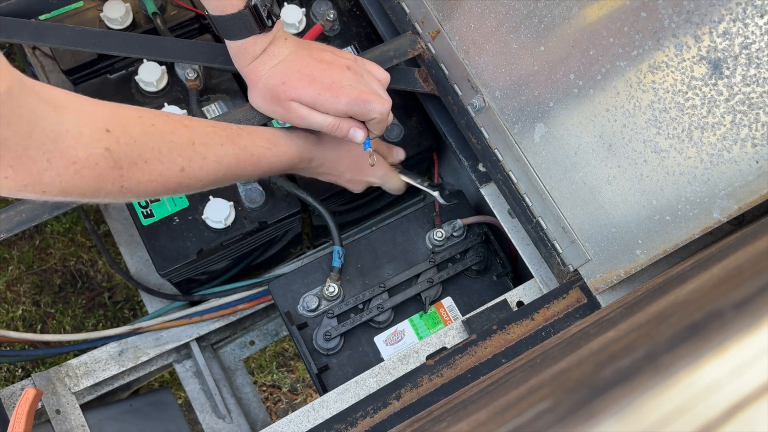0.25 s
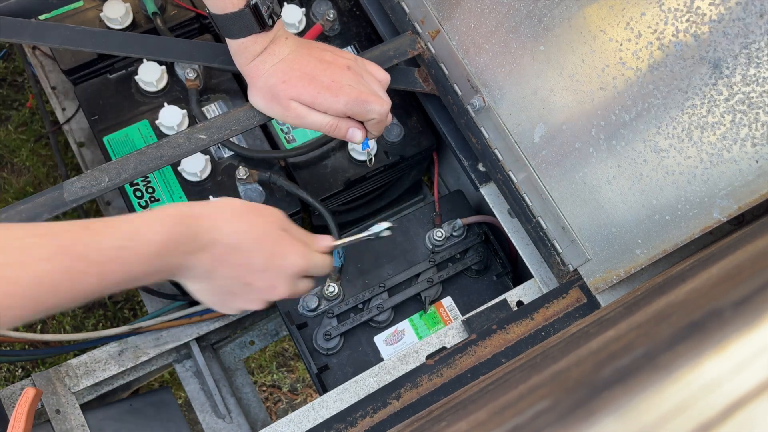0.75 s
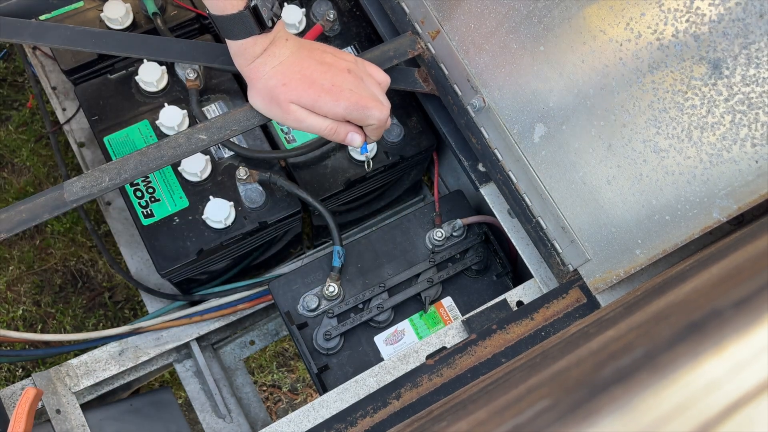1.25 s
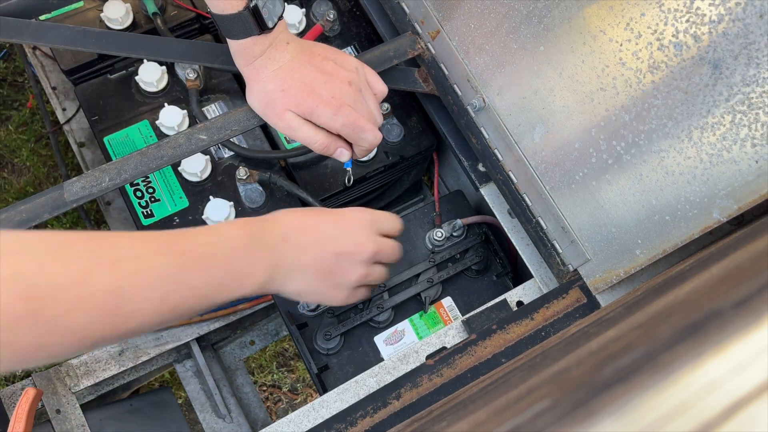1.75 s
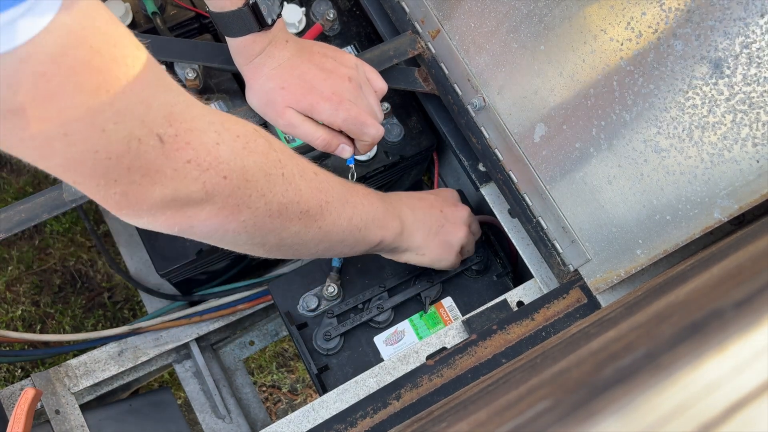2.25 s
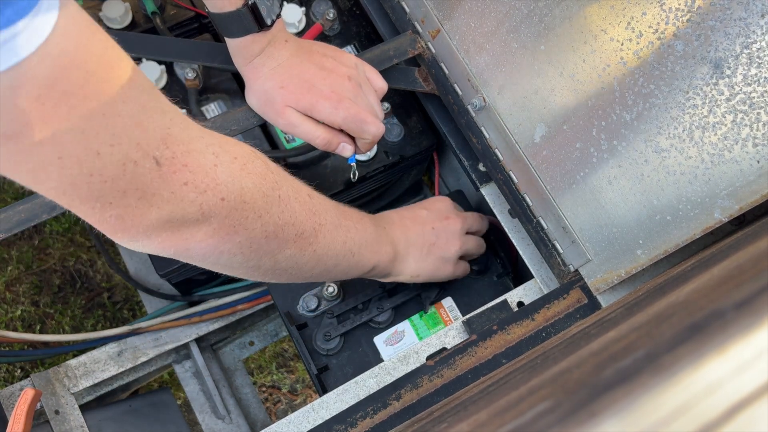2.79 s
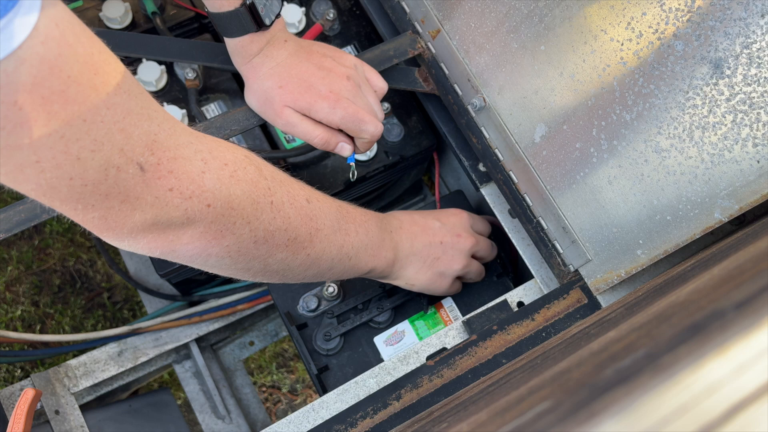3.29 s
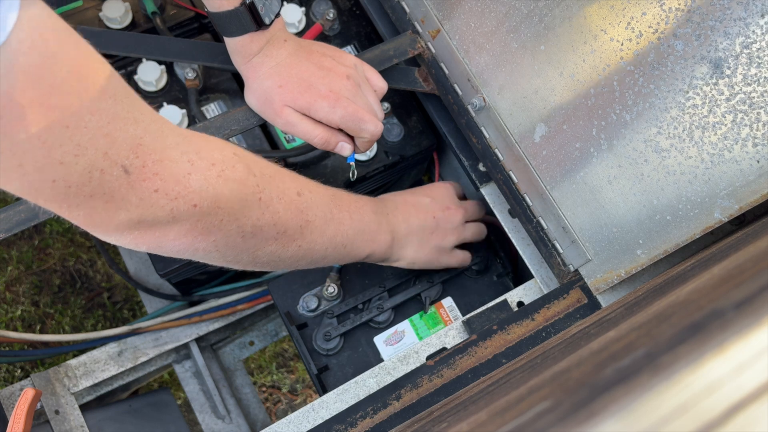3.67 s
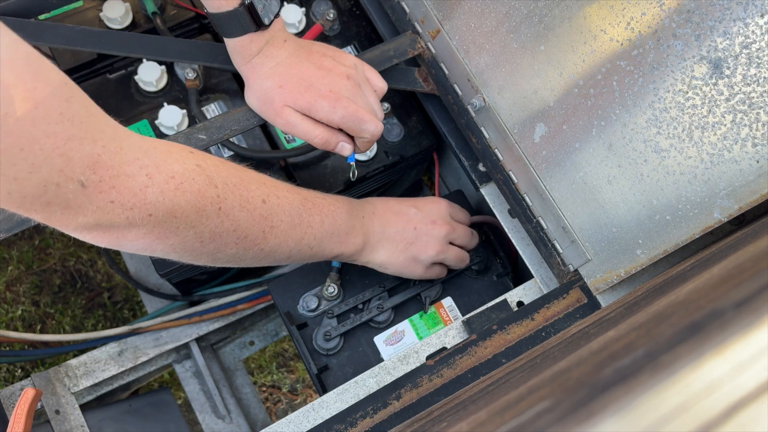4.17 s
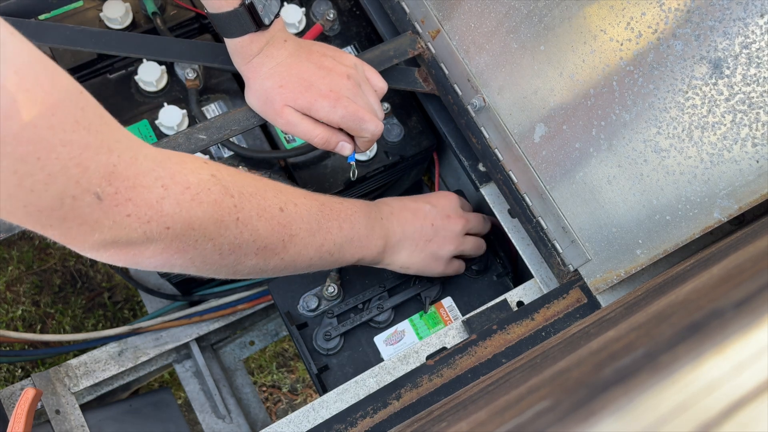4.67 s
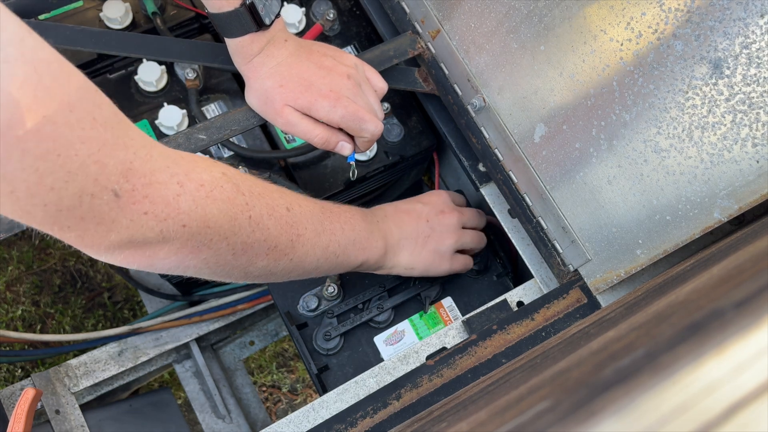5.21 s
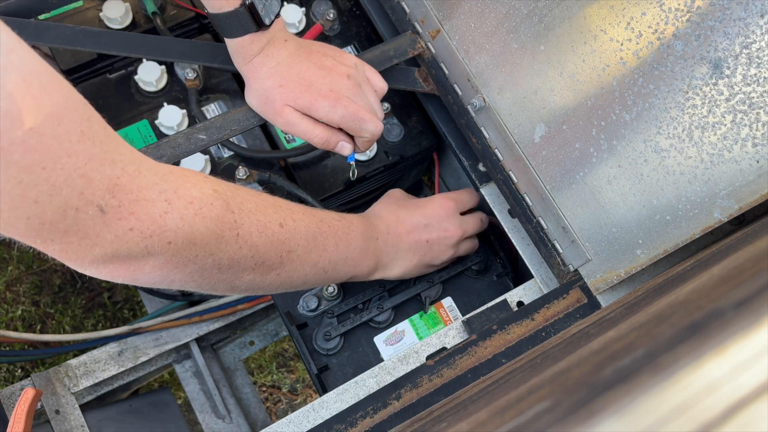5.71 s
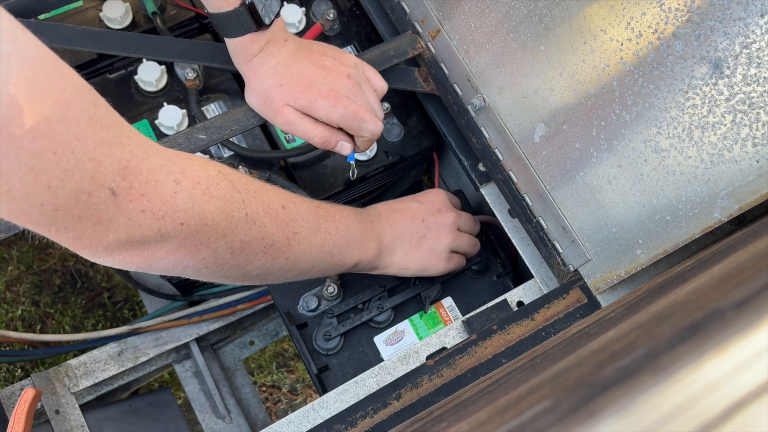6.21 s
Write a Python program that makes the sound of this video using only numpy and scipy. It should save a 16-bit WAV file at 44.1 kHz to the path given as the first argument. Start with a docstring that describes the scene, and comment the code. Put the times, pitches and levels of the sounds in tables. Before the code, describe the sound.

Outdoors, close stereo microphone, with a soft, low rumble of far traffic throughout. At about 0.1 s a spanner comes off a nut with two or three small clicks and a dull low thump; then only faint rustle and airy sleeve hiss, swelling near 0.8 s. From 1.33 to 1.5 s the spanner hits a sheet-metal frame and bounces: a loud, bright, rattling clang, strongest at 1.40 and 1.46 s, with low hollow thumps and a short ring dying quickly. A bright skin-and-cloth hiss brushes by at 1.9 s. From 2.4 s fingers spin the nut off: tiny irregular ticks, scuffs and gritty rubbing, with a clearer click at 2.84 s, others around 3.65, 4.14 and 4.65 s. It thins after 5 s, while faint distant tones swell around 5.5 and 5.9 s, then firmer clicks cluster from 6.07 s, the sharpest at 6.37 s.

```python
"""Outdoors at a battery box, a small stereo microphone close by: a spanner leaves the nut, is dropped on a
sheet-metal frame and bounces, made of shaped noise for crack and dense ring, and of struck modes.
Low thumps ring the box. Fingers spin the nut off its stud with ticks, scuffs and a grainy rustle, made of
noise grains, struck modes and box resonances; skin and sleeve hiss in bright noise as the arm moves.
Far traffic rumbles underneath in wavering noise bands, with two faint tones from narrow resonances."""
import sys
import numpy as np
from scipy import signal
from scipy.fft import rfft, irfft, next_fast_len
from scipy.io import wavfile

SR = 44100
rng = np.random.default_rng(int(sys.argv[2]) if len(sys.argv) > 2 else 0)


def store_wav(level_fs):
    """Save 16-bit WAV to argv[1]."""
    pcm = np.round(np.clip(np.atleast_2d(level_fs), -1, 1) * 32767)
    wavfile.write(sys.argv[1], SR, pcm.T.astype(np.int16))


N = 284445
T = np.arange(N) / SR


def from_db(db):
    """dB to gain."""
    return np.exp(np.asarray(db) * np.log(10) / 20)


def rms_one(x):
    """Scale to rms 1."""
    return x / np.sqrt(np.mean(x ** 2) + 1e-20)


def in_time(curve):
    """A (seconds, value) table read at every sample."""
    return np.interp(T, *np.transpose(curve))


def at_hz(curve, hz):
    """A (Hz, value) table read on a log-frequency axis."""
    points_hz, values = np.transpose(curve)
    return np.interp(np.log(hz), np.log(points_hz), values)


def drift(corner_hz):
    """Slow random wander of rms 1: noise through two equal low-pass poles, at a fortieth of the rate."""
    r = np.exp(-2 * np.pi * corner_hz * 40 / SR)
    noise = rng.standard_normal(N // 40 + 2002)
    slow = signal.lfilter([1], [1, -2 * r, r * r], noise)[2000:]
    return np.interp(np.arange(N) / 40, np.arange(len(slow)), rms_one(slow))


def resonance(x, hz, width_hz):
    """Two-pole peak of gain 1."""
    r = np.exp(-np.pi * width_hz / SR)
    poles = [1, -2 * r * np.cos(2 * np.pi * hz / SR), r * r]
    return signal.lfilter(np.array([1, 0, -1]) * (1 - r * r) / 2, poles, x)


def ring_width(t60):
    """Width in Hz of a resonance that dies by 60 dB in t60 seconds."""
    return np.log(1000) / np.pi / t60


def ring(clicks, hz, t60):
    """A unit click sets a dying sine of starting height 1 ringing."""
    r, w = from_db(-60 / (t60 * SR)), 2 * np.pi * hz / SR
    return signal.lfilter([0, np.sin(w)], [1, -2 * r * np.cos(w), r * r], clicks)


def tilt(hz, bass_db, treble_db):
    """Colour of a contact in dB: a slope each side of 3 kHz, in full from two octaves away."""
    octaves = np.log2(hz / 3000)
    if octaves < 0:
        return bass_db * min(-octaves / 2, 1)
    return treble_db * min(octaves / 2, 1)


def lean(balance, hz):
    """Gains of the left and right port from a left-minus-right balance in dB."""
    half_db = at_hz(balance, hz) / 2
    return from_db([[half_db], [-half_db]])


def rise_s(hz):
    """Build-up time of a struck body: far shorter at high pitches."""
    return 0.0017 * (500 / hz) ** 2


def favour(hz, pitches_hz):
    """How near a mode lies to the pitches of each contact, 0-1; near modes are struck harder."""
    width_octaves = 0.085
    return np.exp(-(np.log2(hz / pitches_hz) / width_octaves) ** 2).max(axis=1)


def decays(blows, hz, t60s, length):
    """Power of all blows in one band: each builds up quickly and dies away."""
    power = np.zeros(length)
    for (s, db, bass_db, treble_db, *_), t60 in zip(blows, t60s):
        start = round(s * SR)
        t = T[:min(int(.4 * SR), int(1.5 * t60 * SR))]
        dying = from_db(db + tilt(hz, bass_db, treble_db) - 60 * t / t60)
        building = 1 - np.exp(-t / rise_s(hz))
        power[start:start + len(t)] += ((dying * building) ** 2)[:length - start]
    return power


def bands(source, envelope, spectrum, likeness, balance):
    """Third-octave noise: two draws of (mid, side) are shaped by envelope(Hz), then filtered band by band."""
    low_hz, high_hz = spectrum[0][0], spectrum[-1][0]
    edges = 25 * 2 ** (np.arange(30) / 3)
    edges = edges[(edges > low_hz * 1.2) & (edges < high_hz * 1.05)]
    centres = np.sqrt(edges[1:] * edges[:-1])
    power = np.sum(from_db(at_hz(spectrum, centres)) ** 2 * np.diff(edges)) / (SR / 2)
    out = 0
    for k, hz in enumerate(centres):
        sos = signal.butter(2, edges[k:k + 2], "band", fs=SR, output="sos")
        # neighbouring bands take different draws; shaping before filtering lets nothing sound early
        mid, side = signal.sosfilt(sos, source[k % 2] * envelope(hz) + 1e-18)
        alike = np.clip(at_hz(likeness, hz), -1, 1)
        pair = np.sqrt(1 + alike) * mid + np.sqrt(1 - alike) * side * [[1], [-1]]
        out = out + from_db(at_hz(spectrum, hz)) * pair * lean(balance, hz)
    return out / np.sqrt(2 * power)


def struck(blows, modes, level_db, spread_db, likeness, balance, length):
    """Every blow strikes every mode with a strength of its own; level_db(Hz) sets the common level."""
    out = np.zeros((2, length))
    strengths = rng.normal(0, 1, (len(blows), len(modes)))
    starts = np.round(blows[:, 0] * SR).astype(int)
    for k, (hz, db, t60) in enumerate(modes):
        tilt_db = tilt(hz, blows[:, 2], blows[:, 3])
        clicks = np.full(length, 1e-18)
        clicks[starts] = from_db(blows[:, 1] + tilt_db + level_db(hz) + db + spread_db * strengths[:, k])
        # a fast-dying copy is taken away, so that the mode builds up
        build_up = min(np.log(1000) * rise_s(hz), t60 / 2)
        sound = ring(clicks, hz, t60) - ring(clicks, hz, build_up)
        # each mode reaches one port later, the sides taking turns
        lag = round(np.arccos(np.clip(at_hz(likeness, hz), -1, 1)) / (2 * np.pi * hz) * SR)
        out += np.array([sound, np.roll(sound, lag)])[::(-1) ** k] * lean(balance, hz)
    return out


# Bounces of the spanner on the frame, close by. Each row: start in seconds, level in dB, bass in dB re level,
# treble in dB re level, ring length as a factor, low pitch in Hz, high pitch in Hz.
BOUNCES = [(1.2582, -58, -6, -28, 18, 860, 2170), (1.335, -15, -1, 0.5, 1.57, 500, 869),
           (1.3616, -34, 0, -8, 5, 1240, 3500), (1.3686, -30.5, 2, -12, 0.87, 860, 1480),
           (1.4, -1.5, -4.5, 0, 1.5, 870, 1186), (1.414, -19.5, -4, -11.5, 1, 520, 680),
           (1.4214, -17, -4, -5, 1.8, 1491, 4700), (1.4327, -19, 1.5, -10, 0.36, 520, 380),
           (1.457, -2.5, -5, -2.5, 1.7, 880, 5230), (1.4795, -16.5, -1.5, 0, 1.81, 987, 284),
           (1.5106, -34, 3, -17, 4, 1103, 1755)]
# Many close modes of the sheet-metal frame. Each row: frequency in Hz, relative density in dB per Hz.
FRAME_SPECTRUM = [(71, -45), (120, -16), (279, -7.5), (413, -12), (518, -4.5), (1510, -8), (1640, -12),
                  (1750, -12), (3450, -15), (4700, -9), (7860, -14.5), (13200, -10.5), (16500, -40.5)]
# Dying of the dense ring, before the bounce's factor. Each row: frequency in Hz, t60 in seconds.
FRAME_T60 = [(150, 0.21), (500, 0.12), (1500, 0.074), (4000, 0.063), (12000, 0.035)]
# Modes of spanner and frame that stand out. Each row: frequency in Hz, relative level in dB, t60 in seconds.
SPANNER_MODES = [(201.4, -9.5, .3), (252, -11, 0.2), (284, -10, 0.22), (376, -9, 0.18), (476, -7, .1),
                 (515, 0, 0.12), (590, -10, 0.12), (675, -5, .08), (725, -8, .08), (806, -1, 0.1),
                 (880, 2, 0.045), (985, -1, 0.16), (1090, -9, 0.1), (1186, 0, .06), (1230, -4, .12),
                 (1477, -3, 0.12), (1725, -3, 0.04), (1762, -8, .15), (2130, -3, 0.06), (2640, -10, 0.12),
                 (3035, -1.5, 0.025), (3200, -6, 0.04), (3890, -6, 0.06), (4380, -7, 0.06), (4590, -4, .05),
                 (4800, -3, 0.03), (5090, -3, 0.03), (5620, -9, 0.03), (6280, -6, 0.06), (6900, -7, 0.05),
                 (10070, -8, 0.02), (12200, -5, 0.02), (13000, -4, .02), (12390, -33, .33)]
# Stereo of the frame at the microphone. Each row: frequency in Hz, left-right likeness from -1 to 1.
FRAME_LIKENESS = [(100, 0.51), (300, 0.78), (1000, 0.099), (2000, 0.53), (5000, 0.61), (12000, 1)]
# Side on which the frame lies. Each row: frequency in Hz, left minus right in dB.
FRAME_BALANCE = [(60, 2), (180, 0.5), (550, 7), (1650, 3.5), (4970, 1.5), (15000, -0.5)]
FRAME_DB, CRACK_DB, CRACK_T60_S = -8, 6, .012
SPANNER_DB, BOUNCE_FAVOUR_DB = -15.5, 9
STRIKE_SPREAD_DB = 2.5   # each bounce strikes the modes a little differently
DENSE_RING_SHARE, RATTLE_DB = .85, -1


def spanner():
    """Each bounce: a short crack, the dense ring of the frame dying band by band, and the clear modes."""
    length, blows = int(2.2 * SR), np.array(BOUNCES)

    def envelope(hz):
        dense_ring = decays(blows, hz, blows[:, 4] * at_hz(FRAME_T60, hz), length)
        crack = decays(blows, hz, [CRACK_T60_S] * len(blows), length)
        return from_db(FRAME_DB) * np.sqrt(dense_ring + from_db(CRACK_DB) ** 2 * crack)

    def level_db(hz):
        return SPANNER_DB + BOUNCE_FAVOUR_DB * favour(hz, blows[:, 5:])

    noise = rng.standard_normal((2, 2, length))
    frame = bands(noise, envelope, FRAME_SPECTRUM, FRAME_LIKENESS, FRAME_BALANCE)
    rattle = 0   # the rattling frame keeps exciting the clear modes
    for k, (hz, db, t60) in enumerate(SPANNER_MODES):
        rattle = rattle + (-1) ** k * from_db(db) * resonance(frame, hz, ring_width(t60))
    clear = struck(blows, SPANNER_MODES, level_db, STRIKE_SPREAD_DB, FRAME_LIKENESS, FRAME_BALANCE, length)
    out = DENSE_RING_SHARE * frame + from_db(RATTLE_DB) * rattle + clear
    return np.pad(out, ((0, 0), (0, N - length)))


# Soft low pushes of hand and spanner into the box. Each row: start in seconds, level in dB, pitch in Hz.
THUMPS = [(0.102, -40.5, 350), (0.123, -47, 280), (0.146, -46, 158), (.183, -33, 113.6),
          (1.341, -35.5, 215), (1.403, -33, 120), (1.445, -30, 240), (1.479, -23, 257), (1.501, -33.5, 193),
          (1.51, -32.5, 92.5), (1.579, -39.5, 170.5), (1.573, -37, 276)]
# Low modes of the hollow box. Each row: frequency in Hz, relative level in dB, t60 in seconds.
HOLLOW = [(85.62, -4.5, 0.27), (115, 1, 0.11), (150, 1.5, 0.17), (216, 3.5, 0.096), (254, -3.5, 0.28),
          (285.4, -9, 0.4), (348, -2.5, 0.097)]
PUSH_OCTAVES = 0.47   # a push sounds the modes near its pitch


def thumps():
    """Each push rings the low modes of the box near its pitch, with a soft start, alike at both ports."""
    out = np.zeros(N)
    click = np.eye(1, SR // 2)[0] + 1e-18
    for hz, mode_db, t60 in HOLLOW:
        soft = ring(click, hz, t60) * (1 - np.exp(-T[:len(click)] * hz * 2))
        for s, db, pitch_hz in THUMPS:
            start = round(s * SR)
            nearness = np.exp(-(np.log2(hz / pitch_hz) / PUSH_OCTAVES) ** 2)
            out[start:start + len(click)] -= from_db(db + mode_db) * nearness * soft
    return out


# Short scuffs of finger, thread and cable at the box. Each row: middle in seconds, level in dB,
# bass in dB re level, treble in dB re level, low pitch in Hz, high pitch in Hz.
SCUFFS = [(0.095, -67.5, 22, 0, 925, 2570), (0.118, -53.5, 1, 15, 625, 4100),
          (0.17, -78, 2, -13, 686, 3230), (0.268, -64, -6, 16, 656, 3100), (1.295, -64, 3, 4, 857, 2140),
          (1.64, -67, 1, -15, 1414, 2920), (1.695, -66, -3, 0, 1220, 4350),
          (1.955, -70, 11.5, 20, 1184, 4304), (2.169, -69.5, -1, 21.5, 652, 3620),
          (2.403, -61.5, -6, 14, 643, 3610), (2.475, -70, 12.5, 16, 609, 3620),
          (2.615, -72, 17, 14, 635, 3210), (2.688, -65.5, 13.5, 15, 920, 2710),
          (2.715, -77, 17, 4, 703, 3160), (2.77, -72, -2, 0, 730, 2660), (2.809, -56, 1.5, 13, 699, 3530),
          (2.836, -61, 8, 5, 650, 3640), (2.875, -68, -2, -2, 730, 2670), (2.926, -69.5, 19, -9, 930, 4430),
          (3.135, -64, -3, 13, 738, 3640), (3.355, -80, 26, 0, 663, 2380), (3.376, -68.5, 8, 12, 609, 3660),
          (3.413, -74.5, 14, 0, 1210, 3640), (3.51, -69, -9, -8, 731, 3610),
          (3.534, -67, 7, 17.5, 684, 3800), (3.63, -69.5, -5, 9, 920, 2700), (3.657, -56, 1, 6, 632, 2730),
          (3.704, -67.5, 9.5, 5, 914, 2760), (3.972, -71, -6, 7, 840, 2740),
          (4.266, -75.5, 10.5, 26, 662, 4880), (4.31, -69, -19, 17, 787, 3646),
          (4.52, -76, 18, 1, 1260, 3650), (4.72, -60.5, 1, 6, 1700, 3405),
          (4.778, -72.5, 2.5, 22, 731, 4360), (4.87, -82, 3, 28, 716, 2870),
          (5.053, -73, 9.5, 16, 686, 2290), (5.2, -67, -1, 12, 703, 3590), (5.42, -74, -1, 13, 652, 3340),
          (5.663, -69.5, 2, -5, 693, 3600), (5.774, -76, 15, 19, 761, 2630),
          (5.95, -70.5, 10, 10, 678, 3650), (6.048, -65.5, -1.5, -10, 873, 3210),
          (6.11, -60.5, 5.5, -5, 660, 2640), (6.387, -55, 2.5, -8, 632, 3760)]
SCUFF_HALF_S, SCUFF_LENGTH_SLOPE = 0.017, 0.23   # at 3 kHz; the low knock is shorter than the hiss


def swells(hz, boost_db):
    """Power of all scuffs in one band: each swells and fades like a bell curve."""
    power = np.zeros(N)
    half = SCUFF_HALF_S * (hz / 3000) ** SCUFF_LENGTH_SLOPE
    for (s, db, bass_db, treble_db, *_), extra_db in zip(SCUFFS, boost_db + np.zeros(len(SCUFFS))):
        near = slice(max(int((s - 3 * half) * SR), 0), int((s + 3 * half) * SR))
        bell = np.exp(-((T[near] - s) / half) ** 2)
        power[near] += from_db(db + extra_db + tilt(hz, bass_db, treble_db)) ** 2 * bell
    return power


FAINT_FROM_S, FAINT_TO_S, FAINT_TICKS = 1.9, 6.3, 16
FAINT_DB, FAINT_SPREAD_DB = -62.5, 3


def faint_ticks():
    """Faint touches as the fingers turn the nut: rows like TICKS, drawn at random where the scuffs are."""
    when, pitch, size = rng.random((FAINT_TICKS, 3)).T
    flat = np.zeros(FAINT_TICKS)
    busy = np.cumsum((swells(3000, 0) > from_db(-170)) * (T > FAINT_FROM_S) * (T < FAINT_TO_S))
    s = np.searchsorted(busy, when * busy[-1]) / SR
    db = FAINT_DB + FAINT_SPREAD_DB * (2 * size - 1)
    return np.transpose([s, db, flat, flat, 650 * 2 ** (1.2 * pitch), 2400 * 2 ** pitch])


# Nut, lugs and box when tapped or scraped. Each row: frequency in Hz, relative level in dB, t60 in seconds.
NUT = [(647.3, 1.5, 0.035), (719, 0, 0.019), (913, -2.5, 0.045), (1228, -8, 0.023), (1430, -3.5, 0.022),
       (1680, -8, 0.027), (2130, -16, .04), (2447, -18, 0.04), (2690, -9.5, 0.014), (2830, -18, 0.0092),
       (3180, -12, 0.027), (3644, -10.5, 0.024), (3840, -17, .04), (4350, -12, 0.029), (4725, -13.5, 0.046),
       (4880, -23, 0.015)]
# Side on which the fingers work. Each row: frequency in Hz, left minus right in dB.
TOUCH_BALANCE = [(60, -0.5), (240, -2), (950, 4), (3770, 2), (15000, -1.5)]
SCRAPE_DB, SCRAPE_FAVOUR_DB = 9, 14
CATCHES_PER_S, CATCH_SPREAD_DB = 600, 5   # uneven catches of a scrape


def scrapes():
    """Gritty catches under each scuff sound the nut's modes, most of all those near its pitches."""
    sizes = from_db(CATCH_SPREAD_DB * np.minimum(rng.exponential(1, N), 3))
    catches = rms_one((rng.random(N) < CATCHES_PER_S / SR) * rng.choice([-1, 1], N) * sizes)
    out = 0
    for hz, db, t60 in NUT:
        boost_db = SCRAPE_DB + db + SCRAPE_FAVOUR_DB * favour(hz, np.array(SCUFFS)[:, 4:])
        push = np.roll(catches, rng.integers(N)) * np.sqrt(swells(hz, boost_db))
        out = out + resonance(push + 1e-18, hz, ring_width(t60)) * lean(TOUCH_BALANCE, hz)
    return out


# The clearest touches of nut, spanner and cable lugs. Each row: start in seconds, level in dB,
# bass in dB re level, treble in dB re level, low pitch in Hz, high pitch in Hz.
TICKS = [(0.088, -44, 0, -16, 1410, 2680), (0.106, -41, 0, 15.5, 650, 4130),
         (0.1405, -33, 0.5, -12, 1430, 3030), (1.918, -62, 16.5, 24, 690, 3620),
         (2.151, -61.5, 9, 2, 790, 3150), (2.3783, -52.5, -4.5, 8, 720, 2590),
         (2.598, -48, -12, 2.5, 970, 5230), (2.6738, -54, 3, 20, 900, 3710),
         (2.7104, -57.5, -13, 14, 690, 3160), (2.776, -54, -1, -3, 700, 2670),
         (2.792, -47.5, -9, -8, 1450, 3210), (2.8408, -32, -19, -0.5, 1200, 3715),
         (2.9182, -45, -8, -3, 940, 2640), (2.967, -64, -2, -13, 1220, 2670),
         (3.0271, -44.5, -19, 5.5, 1440, 2680), (3.131, -55, 5, 10, 730, 3620),
         (3.2956, -56, 2, -12, 730, 2393), (3.356, -61, 9, -8, 890, 2414),
         (3.3678, -55.5, 17.5, 19, 610, 3664), (3.527, -60, -3, -2, 690, 3770),
         (3.6108, -61, -1, -10, 620, 2706), (3.6593, -44, -11, -6, 610, 2690),
         (3.6874, -49, -3, -9, 820, 4380), (3.843, -54.5, 10, 13.5, 970, 4120),
         (3.932, -60, -3, -8, 650, 2784), (3.9504, -55, -1, -3, 1030, 3600), (3.983, -63, 7, 0, 690, 2662),
         (4.1432, -44.5, -4, 3.5, 670, 2804), (4.263, -61, 13.5, 12.5, 680, 4870),
         (4.5, -53, 10.5, 16, 1200, 3704), (4.5025, -64, 20, -15, 1220, 684),
         (4.539, -61.5, 9, -5, 970, 2660), (4.624, -52.5, 3, 3, 1730, 2630),
         (4.652, -40.5, -3, 1, 2670, 3460), (4.713, -48, -10, -5, 1680, 3330),
         (4.8457, -61.5, 9, -14, 1150, 2070), (5.0302, -58.5, 4, -9.5, 680, 3030),
         (5.1712, -60.5, 10.5, 8, 750, 2293), (5.6543, -63.5, -7.5, -2, 690, 3630),
         (5.908, -49.5, -4.5, -10.5, 650, 2590), (5.9714, -62, -10, -18, 650, 2787),
         (6.0707, -40.5, -9, -8, 1230, 2690), (6.0975, -45.5, -4, -1, 1200, 3630),
         (6.115, -41.5, -12, -15, 650, 2550), (6.3392, -60, -1, -9.5, 900, 3500),
         (6.3545, -45, 7, 2, 2670, 3860), (6.359, -53, 11, -10, 690, 1220),
         (6.3724, -27.5, -8, 0.5, 1590, 2650), (6.4005, -40, -12, -7, 3650, 2670),
         (6.405, -41, -9, -7, 4350, 2700)]
# Level of the grainy mid rustle: rattle tail after the bounces, then fingers rubbing.
# Each row: time in seconds, level in dB.
RUSTLE = [(0, -70), (.07, -104), (.15, -65.5), (.3, -77), (.45, -85), (1.25, -88), (1.55, -66), (1.7, -74),
          (2.05, -73.5), (2.27, -87), (2.45, -72), (3.15, -69.5), (3.4, -81.5), (4.3, -75), (4.48, -82.5),
          (4.56, -73.5), (5.1, -77.5), (5.4, -84), (6.45, -77)]
# Colour of touches and rustle before the box. Each row: frequency in Hz, relative density in dB per Hz.
TOUCH_SPECTRUM = [(240, -49.5), (400, -12), (623, -10.5), (1120, -10), (1610, -8.5), (1880, -11),
                  (3850, -18.5), (6800, -18.5), (7440, -19.5), (12100, -28.5), (15500, -48)]
# Stereo of the touches at the microphone. Each row: frequency in Hz, left-right likeness from -1 to 1.
TOUCH_LIKENESS = [(400, 0.62), (1200, 0.86), (3000, 0.9), (6000, 0.8), (12000, 1)]
# Resonances of hollow box and lugs. Each row: frequency in Hz, width in Hz, level in dB.
BOX = [(600, 43, 9.5), (745, 160, 5.5), (865, 200, 0.5), (1192, 92, 8), (1562, 31, -3), (1952, 96, -0.5),
       (2733, 270, -2.5), (2980, 210, 4.5), (3500, 350, -3.5), (4750, 210, 1), (5330, 70, -10)]
GRAINS_PER_S, GRAIN_SPREAD_DB = 3700, 1
TICK_DB, TICK_T60_S = -7, 0.065
TICK_CRACK_DB, TICK_CRACK_T60_S = -4, 0.0058   # each tick opens with a snap
NUT_DB, FAVOUR_DB = -6, 13
TICK_SPREAD_DB = 3   # each tick strikes the modes a little differently
SCUFF_HISS_DB = -6   # share of a scuff that is plain hiss


def fingers():
    """Ticks, scuffs and a grainy rustle (rattle tail, then the rubbed nut), coloured by the hollow box."""
    ticks = np.vstack([TICKS, faint_ticks()])
    sizes = from_db(GRAIN_SPREAD_DB * np.minimum(rng.exponential(1, N), 5))
    slips = (rng.random(N) < GRAINS_PER_S / SR) * sizes
    # each slip is a puff of about a quarter millisecond
    grain = rms_one(signal.lfilter([1], [1, -.9], slips)) ** 2
    rustle = from_db(in_time(RUSTLE) + 1.5 * drift(25)) ** 2

    def envelope(hz):
        t60 = TICK_T60_S * (3000 / hz) ** 0.036   # low bands die later
        taps = from_db(TICK_DB) ** 2 * decays(ticks, hz, [t60] * len(ticks), N)
        snaps = from_db(TICK_CRACK_DB) ** 2 * decays(ticks, hz, [TICK_CRACK_T60_S] * len(ticks), N)
        return np.sqrt((rustle + swells(hz, SCUFF_HISS_DB)) * grain + taps + snaps)

    def level_db(hz):
        return NUT_DB + FAVOUR_DB * favour(hz, ticks[:, 4:])

    noise = rng.standard_normal((2, 2, N))
    touches = bands(noise, envelope, TOUCH_SPECTRUM, TOUCH_LIKENESS, TOUCH_BALANCE)
    boxed = 0.62 * touches
    for k, (hz, width_hz, db) in enumerate(BOX):
        boxed = boxed + (-1) ** k * from_db(db) * resonance(touches, hz, width_hz)
    tapped = struck(ticks, NUT, level_db, TICK_SPREAD_DB, TOUCH_LIKENESS, TOUCH_BALANCE, N)
    return boxed + scrapes() + tapped


# Level of the bright hiss of skin and sleeve. Each row: time in seconds, level in dB.
SLIDE = [(0, -81), (.07, -106), (.15, -66), (.3, -79.5), (.62, -89), (.8, -75), (1.0, -84.5), (1.25, -90),
         (1.55, -82), (1.88, -66), (2.27, -91), (2.42, -77), (3.2, -80.5), (3.3, -81.5), (3.8, -74.5),
         (4.5, -89), (5.1, -86), (5.35, -90), (6.45, -99)]
# Colour of the sliding. Each row: frequency in Hz, relative density in dB per Hz.
HISS_SPECTRUM = [(4410, -65.5), (7500, -37.5), (7730, -18), (11000, -12), (13300, 5), (14600, -6.5),
                 (15500, -39)]


def sleeve():
    """Smooth bright hiss of skin and cloth sliding: noise bands that follow the arm's level."""
    hiss_db = in_time(SLIDE)

    def envelope(hz):
        return from_db(hiss_db + 0.4 * drift(20))

    noise = rng.standard_normal((2, 2, N))
    return bands(noise, envelope, HISS_SPECTRUM, TOUCH_LIKENESS, TOUCH_BALANCE)


# Colour of the far traffic. Each row: frequency in Hz, relative density in dB per Hz.
TRAFFIC_SPECTRUM = [(15, -36), (25, -6.5), (133, -3.5), (199, -14), (376, -21), (444, -21.5), (589, -21),
                    (632, -20.5), (745, -19.5), (1080, -27.5), (1250, -35), (1450, -46), (1830, -58.5),
                    (3620, -57), (7000, -61), (9100, -86), (15400, -120)]
# Level of the rumble. Each row: time in seconds, level in dB.
TRAFFIC_LEVEL = [(0, -51), (.06, -60), (.09, -50), (.5, -54.5), (1.2, -54), (2.0, -53), (3.6, -54.5),
                 (4.6, -52.5), (6.45, -54)]
# Stereo of the far rumble. Each row: frequency in Hz, left-right likeness from -1 to 1.
TRAFFIC_LIKENESS = [(60, 1), (150, 0.87), (380, 0.48), (950, -0.5), (2380, -0.42), (5980, 0.19),
                    (15000, 0.19)]
# Side to which the rumble leans. Each row: frequency in Hz, left minus right in dB.
TRAFFIC_BALANCE = [(60, 0), (380, -3), (2380, -1), (15000, 0.5)]
# Faint tones in the distance. Each row: frequency in Hz, width of each resonance in Hz, base level in dB.
DRONES = [(373, 8.3, -76.5), (663, 13, -76)]
# Coming and going of the tones. Each row: time in seconds, level in dB re base level.
DRONE_LEVEL = [(0, -4), (5.3, 0), (5.5, 12.5), (5.7, 4), (5.9, 9.5), (6.45, -1)]
EDGE_DIP_HZ, EDGE_DIP_WIDTH_HZ = 1600, 900   # dip that steepens the upper edge of the rumble
EDGE_DIP_DEPTH = .5   # 0-1


def traffic():
    """Far rumble; every band wavers a little on its own, and two faint tones come and go."""
    together = drift(13.0)

    def envelope(hz):
        return from_db(0.38 * together + 2.5 * drift(2.2))

    noise = rng.standard_normal((2, 2, N))
    rumble = bands(noise, envelope, TRAFFIC_SPECTRUM, TRAFFIC_LIKENESS, TRAFFIC_BALANCE)
    dipped = rumble - EDGE_DIP_DEPTH * resonance(rumble, EDGE_DIP_HZ, EDGE_DIP_WIDTH_HZ)
    out = from_db(in_time(TRAFFIC_LEVEL)) * dipped
    for hz, width_hz, db in DRONES:
        tone = resonance(rng.standard_normal((2, N)), hz, width_hz)
        tone = rms_one(resonance(tone, hz, width_hz))
        out = out + from_db(db + in_time(DRONE_LEVEL) + drift(1.3)) * tone
    return out


SOFT_TOP_HZ = 15000   # top of the soft layers; fingers and sleeve are cut steeply above this


def scene():
    """All sources as they reach the two ports of the microphone."""
    top_cut = signal.cheby2(8, 30, SOFT_TOP_HZ, fs=SR, output="sos")
    soft = signal.sosfilt(top_cut, fingers() + sleeve())
    return spanner() + thumps() + soft + traffic()


# Phase between the microphone's two ports. Each row: frequency in Hz, lead of the left port in radians.
PORT_PHASE = [(300, 0), (1720, .6), (5860, -.1), (7150, -2.4), (10400, -6), (12400, -6.6), (16000, -10)]
DIP_HZ, DIP_WIDTH_HZ, DIP_DEPTH = 8000, 700, 0.5   # a narrow dip in the whole sound; depth 0-1
BASS_CUT_HZ, CUTOFF_HZ, CEILING = 38, 17150, .86


def record(dry):
    """The ports differ in phase; the whole sound dips near 8 kHz, peaks are rounded, both ends are cut."""
    size = next_fast_len(N + 4096)
    lead = np.interp(np.arange(size // 2 + 1) * SR / size, *np.transpose(PORT_PHASE))
    left = irfft(rfft(dry[0], size) * np.exp(1j * lead), size)[:N]
    heard = np.array([left, dry[1]])
    heard = heard - DIP_DEPTH * resonance(heard, DIP_HZ, DIP_WIDTH_HZ)
    rounded = CEILING * np.tanh(heard / CEILING)
    heard = signal.sosfilt(signal.butter(6, BASS_CUT_HZ, "high", fs=SR, output="sos"), rounded)
    return signal.sosfilt(signal.cheby2(18, 110, CUTOFF_HZ, fs=SR, output="sos"), heard)


dry = scene()
out = record(dry)
store_wav(out)
```